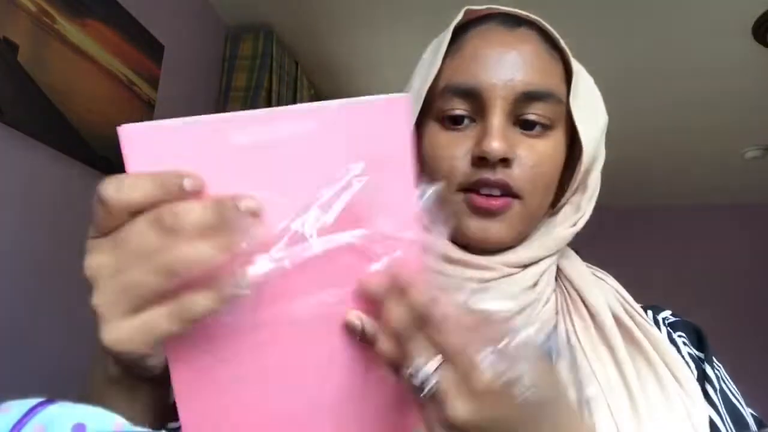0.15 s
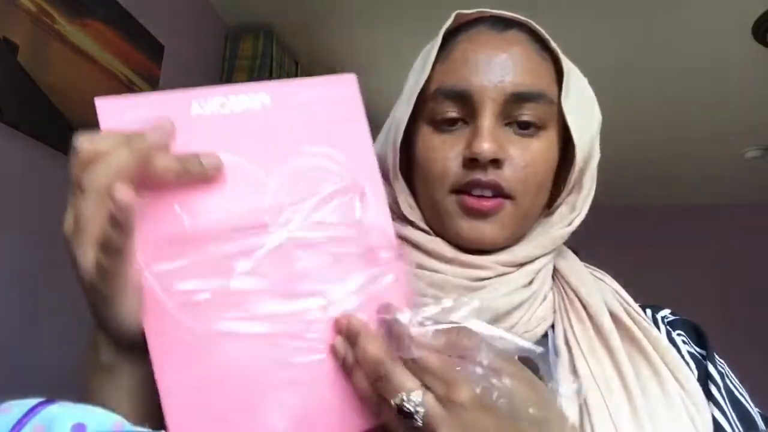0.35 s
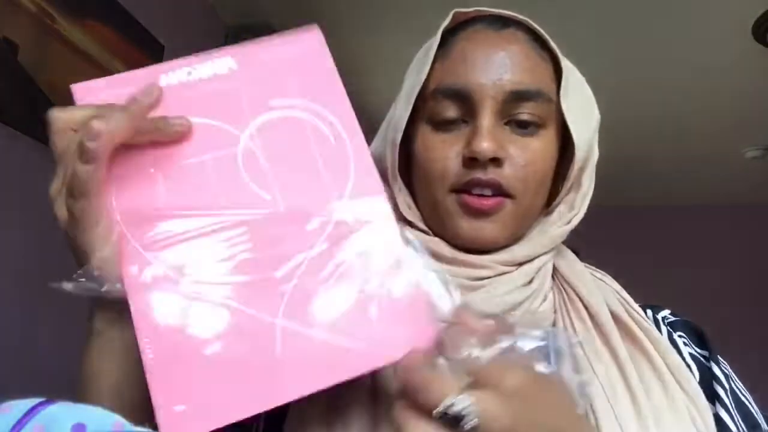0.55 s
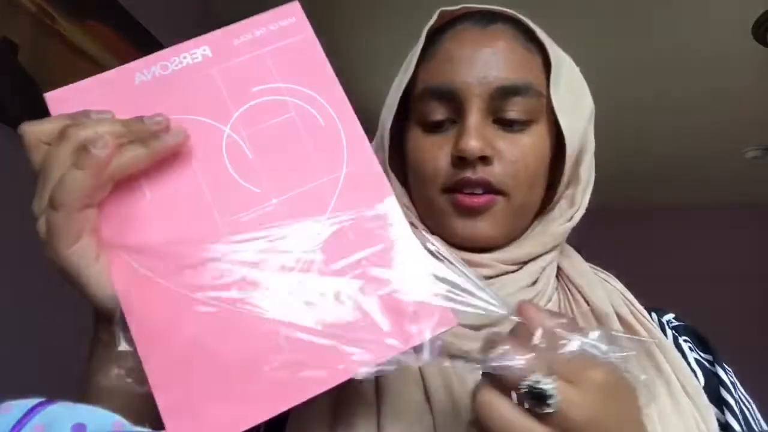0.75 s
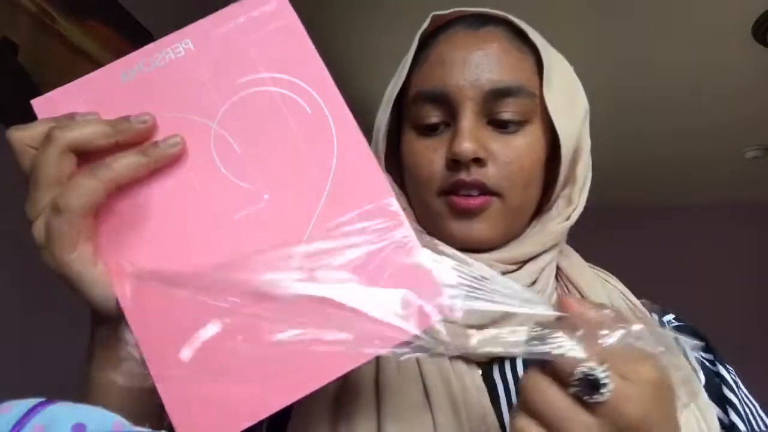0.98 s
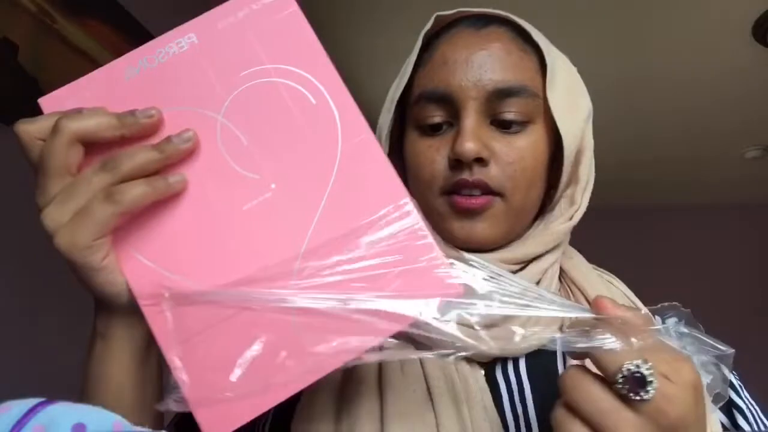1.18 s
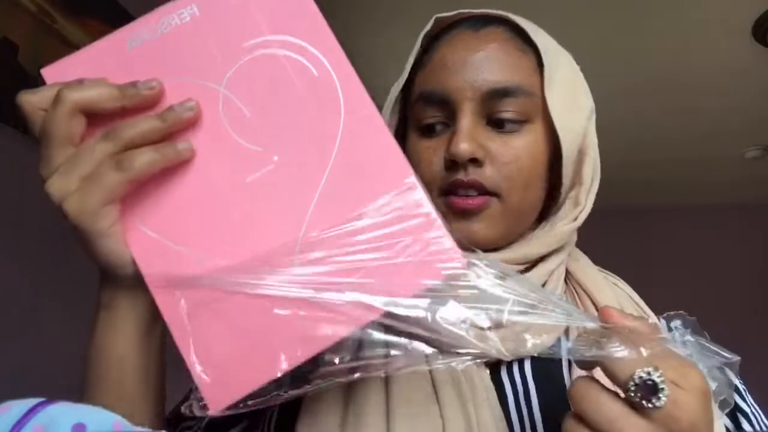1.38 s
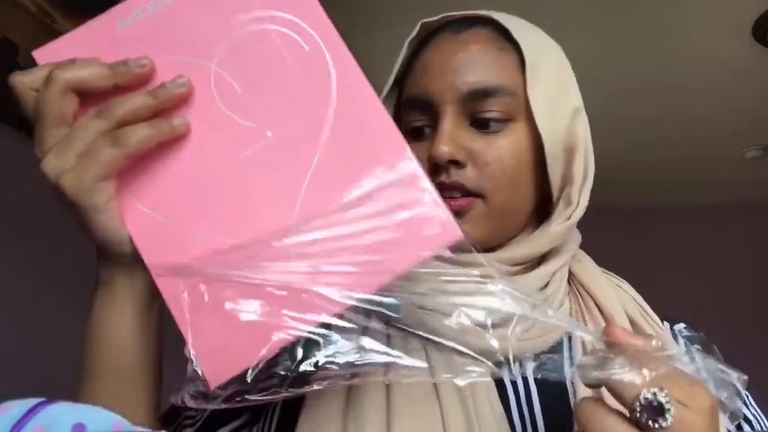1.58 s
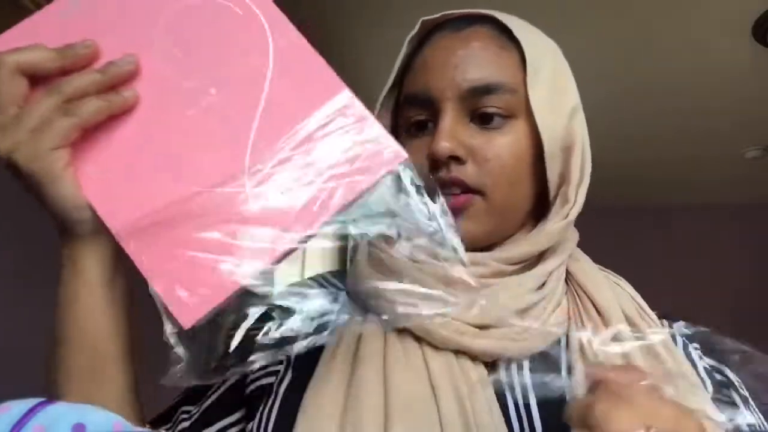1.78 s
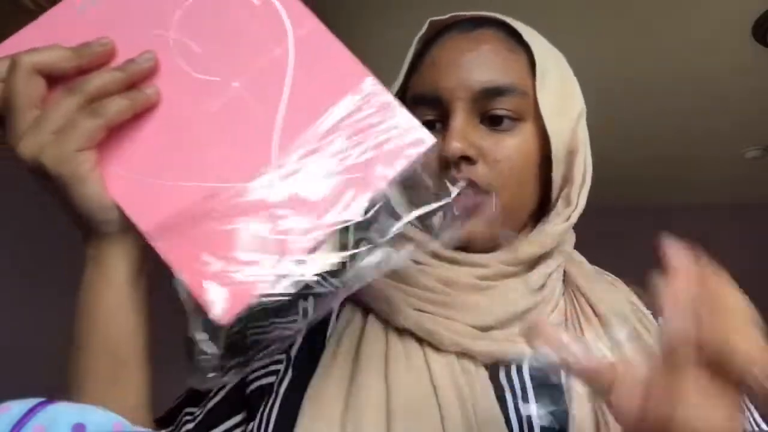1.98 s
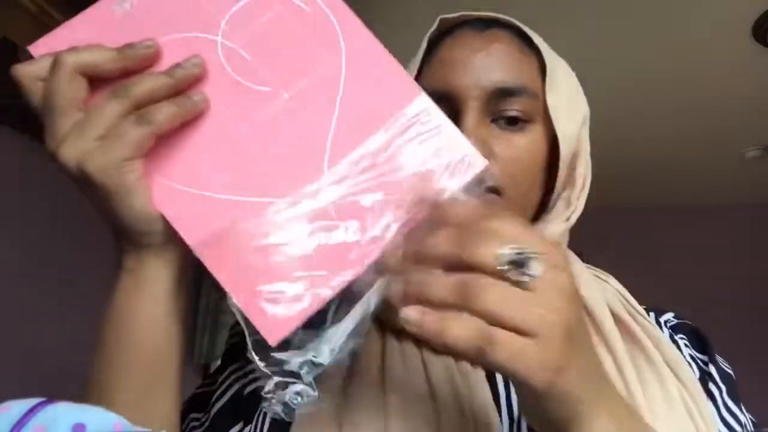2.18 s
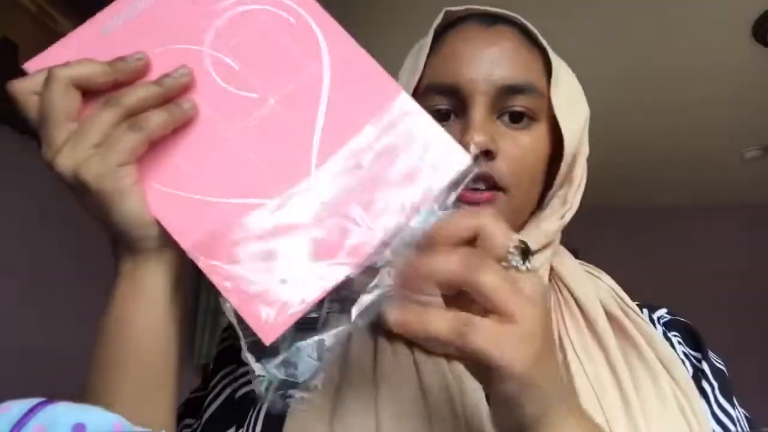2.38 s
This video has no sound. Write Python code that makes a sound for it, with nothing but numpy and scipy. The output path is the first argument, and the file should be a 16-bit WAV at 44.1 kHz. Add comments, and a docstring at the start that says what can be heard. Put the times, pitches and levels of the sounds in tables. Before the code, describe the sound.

Thin plastic wrap is pulled off a card box, close to the microphone in a small room. It snaps three times, slides with a fine crinkle and soft knocks, then snaps four more times, the last loudest.

```python
"""Thin shrink-wrap is pulled off a card box by hand, close to the microphone in a small room.
The taut film lets go with three quick snaps, then slides over the card with a fine crinkle, small
crease ticks and soft knocks of the box. From 1.6 s come four more snaps; the last, at 2.14 s, is the
loudest and jolts the box, and the crinkle dies away. Low room rumble and mains hum lie under it all."""
import sys
import numpy as np
from scipy import signal
from scipy.fft import rfft, irfft
from scipy.io import wavfile
from scipy.ndimage import uniform_filter1d

SR = 44100
rng = np.random.default_rng(int(sys.argv[2]) if len(sys.argv) > 2 else 0)


def master_out(mix):
    """Clip the mix to full scale and print it as 16-bit PCM to the path in sys.argv[1]."""
    frames = np.transpose(np.atleast_2d(mix))
    ceiling = np.clip(frames, -1, 1)
    pcm = np.round(ceiling * 32767).astype(np.int16)
    wavfile.write(sys.argv[1], SR, pcm)


N = 108045


def amp(db):
    """Decibels to gain."""
    return 10 ** (np.asarray(db) / 20)


def unit(x):
    """Scales to rms 1."""
    return x / np.sqrt(np.mean(x ** 2) + 1e-20)


def value_at(points, hz):
    """Interpolates (freq_hz, value) points on a log-frequency axis."""
    freq_hz, value = np.transpose(points)
    return np.interp(np.log(hz + 1), np.log(freq_hz + 1), value)


def fader(points):
    """Turns (time_s, level_db) points into a gain for each sample."""
    return amp(np.interp(np.arange(N) / SR, *np.transpose(points)))


def add(mix, start_s, sound):
    """Mixes a sound in at a time."""
    part = mix[round(start_s * SR):][:len(sound)]
    part += sound[:len(part)]


def noise(spectrum):
    """Noise of a given colour, rms 1."""
    gain = amp(value_at(spectrum, np.fft.rfftfreq(N, 1 / SR)))
    return unit(irfft(rfft(rng.standard_normal(N)) * gain, N))


def wander(seconds):
    """A smooth random curve, rms 1."""
    smoothing = np.exp(-(np.fft.rfftfreq(N, 1 / SR) * seconds) ** 2)
    return unit(irfft(rfft(rng.standard_normal(N)) * smoothing, N))


def equalise(x, spectrum, size=2048):
    """Minimum-phase EQ that keeps attacks sharp."""
    log_gain = np.log(amp(value_at(spectrum, abs(np.fft.fftfreq(size, 1 / SR)))))
    taps = np.fft.ifft(np.exp(np.conj(signal.hilbert(log_gain)))).real
    return signal.fftconvolve(x, taps[:size // 2])[:len(x)]


def ring(hz, cycles, size=3000):
    """A heavily damped mode that dies in a few cycles, gain 1 at its pitch."""
    width_hz = min(hz / (np.pi * cycles), SR / 4)
    return signal.lfilter(*signal.iirpeak(hz, hz / width_hz, SR), signal.unit_impulse(size))


def buckle(splinter_db, decay_s, size=3000):
    """Film buckles: one sharp slip, then a dying spray of tiny ones, the splinters."""
    slips = rng.standard_normal(size) ** 3 * np.exp(-np.arange(size) / SR / decay_s)
    slips *= amp(splinter_db) / np.linalg.norm(slips)
    slips[0] = 1
    return slips


def film_snaps(top_hz=11000):
    """Taut film cracks, springs back and rings; returns the direct sound and the reverb send."""
    # Snaps and the panel, fold and crease they ring: start_s, crack_db, top_db, rebound_s, rebound_db,
    # panel_hz, panel_db, fold_hz, fold_db, crease_hz, crease_db, splinter_db, send_db
    snaps = [(0.1468, -55, 3, 0.00051, -16, 780, -8.5, 1130, -6, 2870, -11, -10, -27),
             (0.2239, -14.5, 2, .0004, -14, 810, 4.5, 1450, 4.5, 3800, -2, -11, -8),
             (0.2722, -8, 3, .00033, -11, 1240, -2, 2870, 5, 3560, 4, -6, -3),
             (1.601, -13.5, -3, .00025, -24, 626, 3.5, 1060, 3.5, 2730, -9, -12, -18),
             (1.6716, -5, 1, .00038, -14, 740, -4, 1880, -17, 7200, -15, -11, -12.5),
             (1.9772, -16, 7, .000315, -18, 690, -2, 1930, -12, 4500, -7.5, -10, -21.5),
             (2.1435, 2.5, -7.5, .00037, -8.5, 936, 8, 1430, 16.5, 4680, 7.5, -3, 4)]
    # Tone of the crack: freq_hz, gain_db
    crack_eq = [(100, -34), (400, -10.5), (1000, -4), (2600, 0), (4500, -2), (8300, 3), (10000, -9.5),
                (12500, -2.5), (15000, -8), (17000, -12)]
    # What the whole sheet radiates into the room: freq_hz, gain_db
    sheet_eq = [(100, 6.5), (450, -0.5), (850, 3), (1500, 4), (2600, 0), (4000, 0.5), (8000, -2.5),
                (10500, -5), (15000, -5.5), (17000, -21)]
    direct, send = np.zeros(N), np.zeros(N)
    for (start_s, crack_db, top_db, rebound_s, rebound_db, panel_hz, panel_db,
         fold_hz, fold_db, crease_hz, crease_db, splinter_db, send_db) in snaps:
        crack = amp(crack_db) * equalise(buckle(splinter_db, decay_s=0.0031), crack_eq)
        crack = equalise(crack, [(top_hz, 0), (top_hz, top_db)])  # high shelf
        panel = amp(panel_db) * ring(panel_hz, cycles=0.95)
        fold = amp(fold_db) * ring(fold_hz, cycles=2.36)
        crease = amp(crease_db) * ring(crease_hz, cycles=2.36)
        add(direct, start_s, crack + panel + fold + crease)
        add(direct, start_s + rebound_s, -amp(rebound_db) * crack)
        add(send, start_s, amp([send_db]))
    return direct, equalise(send, sheet_eq)


def crease_ticks(trim_db=-6):
    """Single creases flip, each a click with its own short ring."""
    # Crease flips: start_s, relative_level_db, pitch_hz, ring_over_click_db
    flips = [(0.0505, -20.5, 1110, 10.5), (0.2053, -19, 1420, 7.5), (0.213, -18.5, 3970, -14),
             (0.2484, -19, 2500, 9), (.4555, -25, 7000, -2), (.458, -12, 3580, -7),
             (0.5013, -20.5, 3000, 0), (0.5604, -13.5, 4030, -15), (0.5855, -23, 3700, 2),
             (0.646, -29, 8200, 4), (0.6556, -27, 6000, -9), (0.724, -26, 6000, -7),
             (0.7702, -17, 7200, -12), (0.7918, -19, 4000, -5), (0.814, -21, 2600, 9),
             (.8165, -20, 6900, 7.5), (0.889, -29, 6000, -14), (0.9192, -17.5, 2980, -18),
             (0.9416, -13, 5000, -11), (0.9593, -19, 1280, 5.5), (0.978, -20, 2320, 8),
             (1.0111, -23, 1050, 15), (1.015, -15.5, 656, 15), (1.0306, -7, 1290, -9),
             (1.0368, -15, 830, 14), (1.045, -31, 650, 9), (1.1069, -16.5, 9000, -17),
             (1.127, -19.5, 1200, 6), (1.1392, -15.5, 1900, 3), (1.1493, -22, 1750, 11.5),
             (1.262, -31.5, 1160, 18.5), (1.292, -32.5, 574, 27.5), (1.323, -34.5, 7500, 9),
             (1.4773, -21.5, 12000, -15), (1.562, -23.5, 7040, -5.5), (1.569, -29, 6600, 6),
             (1.5874, -18, 3500, -15), (1.6453, -22.5, 7750, -1), (1.7252, -33, 5070, 11.5),
             (1.809, -28, 5960, -1.5), (1.91, -34.5, 880, 21.5), (2.1049, -38, 8100, 6),
             (2.1206, -12, 1200, -2), (2.2332, -34, 10000, -17), (2.416, -34, 6900, 2)]
    # Tone of the click: freq_hz, gain_db
    click_eq = [(150, -62), (600, -2), (2000, -5), (7000, -7.5), (11000, -9.5), (16000, -7.5)]
    out = np.zeros(N)
    for start_s, level_db, pitch_hz, ring_db in flips:
        slips = buckle(splinter_db=3.5, decay_s=0.0012)
        ringing = signal.fftconvolve(slips, ring(pitch_hz, cycles=0.64))[:len(slips)]
        add(out, start_s, amp(level_db) * (equalise(slips, click_eq) + amp(ring_db) * ringing))
    return amp(trim_db) * out


def crinkle(grains_per_s=1200, bands=24, spread_db=4, flicker_db=1.5):
    """The pull drives a flickering friction hiss, a stream of tiny creases and a low flex of the card."""
    # Strength of the sliding and crumpling: time_s, level_db
    pull = [(0, -51), (.12, -63.5), (.195, -59), (.24, -42.5), (.30, -44.5), (.35, -56), (.44, -55.5),
            (.47, -54), (.54, -57.5), (.64, -54.5), (.79, -49), (.86, -48.5), (.89, -53.5), (.96, -46.5),
            (1.035, -48), (1.07, -57.5), (1.22, -52.5), (1.37, -55), (1.44, -59), (1.53, -60.5),
            (1.69, -55), (1.78, -58.5), (1.93, -62.5), (2.0, -58), (2.11, -51), (2.23, -54.5),
            (2.34, -64.5), (2.45, -77)]
    # Film rubbing on card: freq_hz, relative_density_db
    slide_spectrum = [(200, -19), (500, 7), (1200, 12), (3000, 4.5), (8000, 0), (11000, 0.5), (13000, 0),
                      (15500, 6.5), (17000, -44)]
    # Card flexing under the pull: freq_hz, relative_density_db
    flex_spectrum = [(60, 17), (120, -10), (190, 0), (300, -8.5), (500, -14.5), (1500, -18)]
    grains = np.zeros(N)
    for pitch_hz in np.geomspace(900, 14000, bands):
        sizes = amp(spread_db * np.minimum(rng.exponential(1, N), 3))
        polarity = rng.choice([-1, 1], N)
        onsets = rng.random(N) < grains_per_s / bands / SR
        grains += signal.oaconvolve(sizes * polarity * onsets, ring(pitch_hz, cycles=0.61))[:N]
    hiss = unit(noise(slide_spectrum) * amp(flicker_db * wander(seconds=0.013)))
    flex = noise(flex_spectrum)
    return fader(pull) * (amp(-9) * hiss + amp(-6.5) * unit(grains) + amp(-4) * flex)


def box_jolts():
    """The box jolts in the hand with a soft, low knock as the film lets go."""
    # Knocks ahead of their EQ: start_s, pitch_hz, level_db
    knocks = [(.225, 278, 0), (.585, 143, 5.5), (1.04, 183, 5), (1.149, 155.6, 4.5), (1.978, 217, -4.5),
              (2.145, 137, 15.5), (2.144, 340, 0)]
    # Dull tone of the card: freq_hz, gain_db
    card_eq = [(100, 5.5), (350, 11), (1500, -26), (16000, -46)]
    out = np.zeros(N)
    for start_s, pitch_hz, level_db in knocks:
        add(out, start_s, amp(level_db) * ring(pitch_hz, cycles=3.2))
    return equalise(out, card_eq)


def room_reverb(send, wet_db=-5.5, build_s=0.0013):
    """The small room adds a short diffuse tail that dies at its own speed in each band."""
    # Decay of the room: freq_hz, t60_s
    decay_times = [(150, 0.17), (700, 0.25), (2000, 0.18), (5000, 0.23), (10000, .22), (16000, .18)]
    hz, t, bands = signal.stft(rng.standard_normal(SR // 2), SR, nperseg=256)
    decay = np.exp(-np.log(1000) * t / value_at(decay_times, hz)[:, None])
    tail = signal.istft(bands * decay, SR)[1]
    tail *= 1 - np.exp(-np.arange(len(tail)) / SR / build_s)
    return amp(wet_db) * signal.fftconvolve(send, tail / np.linalg.norm(tail))[:N]


def wavering_tone(hz, waver_rad, waver_s):
    """A sine whose phase drifts at random, rms 1."""
    t = np.arange(N) / SR
    return np.sqrt(2) * np.sin(2 * np.pi * hz * t + waver_rad * wander(waver_s))


def mains_hum():
    """Two low harmonics of the mains, each wavering slightly."""
    # Hum partials: pitch_hz, level_db
    partials = [(99.5, -54.5), (149.7, -56)]
    return sum(amp(db) * wavering_tone(hz, waver_rad=0.18, waver_s=0.3) for hz, db in partials)


def room_tone(air_db=-48.5):
    """A low rumble rises and falls under steady air; a deep drone swells in the first second."""
    # Colour of the rumble: freq_hz, relative_density_db
    rumble_spectrum = [(10, -21), (22, -7), (40, -42.5), (48, -6), (54, 1.5), (64, -2.5), (74, -42),
                       (100, -19.5), (200, -40), (600, -69)]
    # Swells of the rumble: time_s, level_db
    rumble_swells = [(0, -37.5), (.2, -56), (.5, -44), (.85, -44.5), (1.1, -42), (1.27, -44), (1.34, -41.5),
                     (1.52, -38), (1.8, -40.5), (2.0, -50.5), (2.13, -36.5), (2.3, -55), (2.45, -42.5)]
    # Swell of the drone: time_s, level_db
    drone_swell = [(0, -83), (.2, -45.5), (.27, -39.5), (.4, -37), (.49, -42.5), (.66, -39), (.8, -53),
                   (1.0, -67)]
    # Colour of the room air: freq_hz, relative_density_db
    air_spectrum = [(20, -72), (70, 5), (98, 12.5), (115, -1), (185, 1.5), (235, -10), (350, -13.5),
                    (470, -19.5), (900, -23.5), (1700, -24), (2600, -28.5), (6000, -41), (16000, -58)]
    drone = wavering_tone(hz=53.2, waver_rad=1, waver_s=0.13)
    rumble = noise(rumble_spectrum)
    rumble /= np.sqrt(uniform_filter1d(rumble ** 2, size=8000))  # evened out ahead of the fader
    air = amp(air_db) * noise(air_spectrum)
    return fader(rumble_swells) * rumble + fader(drone_swell) * drone + air


def scene():
    """Film and box with their near echoes and reverb, over hum and room tone, in mono."""
    # Reflections off the box and the table: delay_s, gain_db
    echoes = [(.0009, -22.5), (.0051, -15)]
    snaps, snap_send = film_snaps()
    handling = crease_ticks() + crinkle() + box_jolts()
    direct = snaps + handling
    out = direct + room_reverb(snap_send + handling) + mains_hum() + room_tone()
    for delay_s, gain_db in echoes:
        add(out, delay_s, amp(gain_db) * direct)
    return out[None]


def record(dry):
    """A steep low-pass takes off the very top of the treble."""
    lowpass = signal.firwin(255, cutoff=16300, window=("kaiser", 9), fs=SR)
    return signal.oaconvolve(dry, lowpass[None], "same")


dry = scene()
out = record(dry)
master_out(out)
```